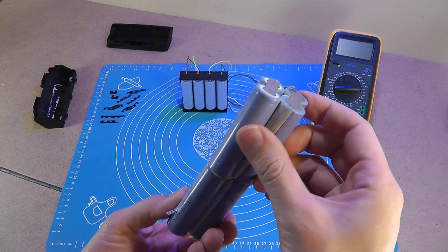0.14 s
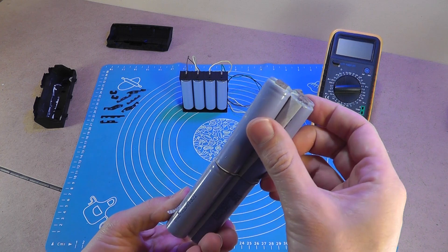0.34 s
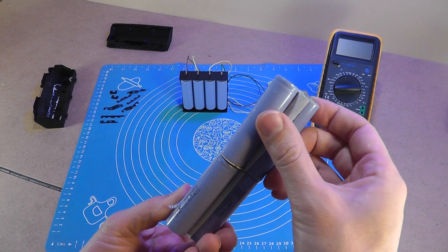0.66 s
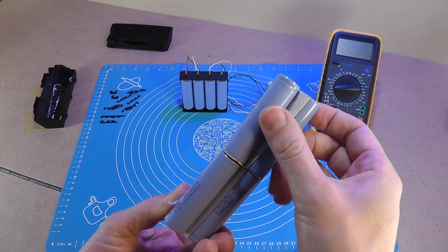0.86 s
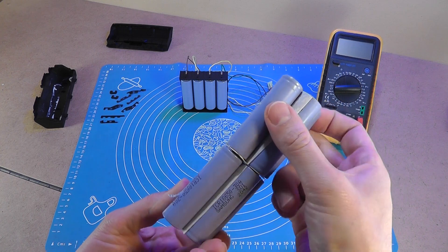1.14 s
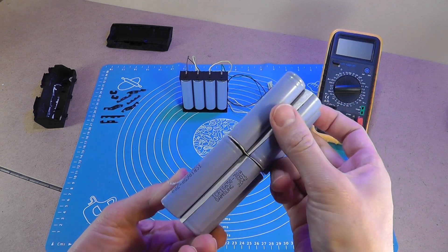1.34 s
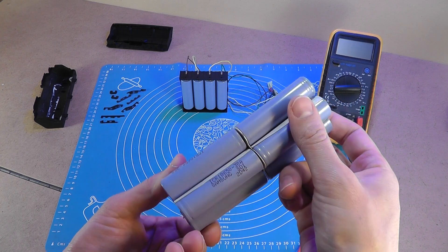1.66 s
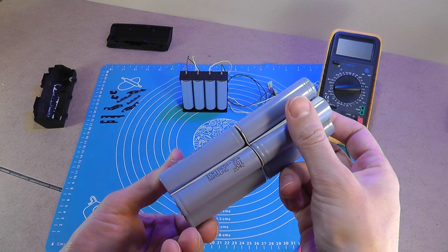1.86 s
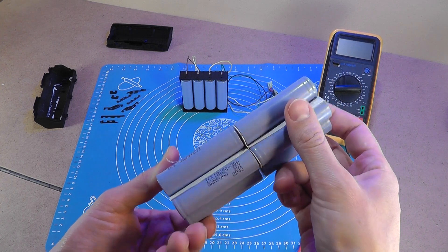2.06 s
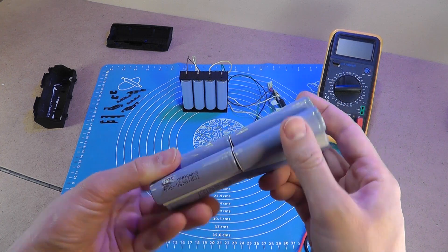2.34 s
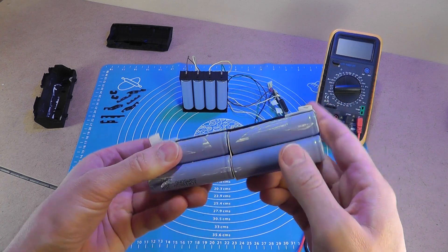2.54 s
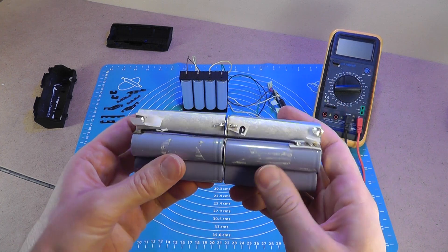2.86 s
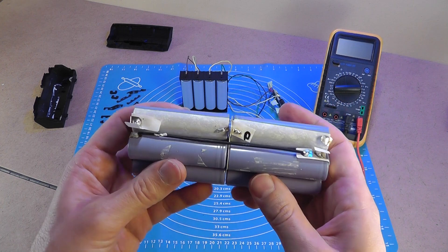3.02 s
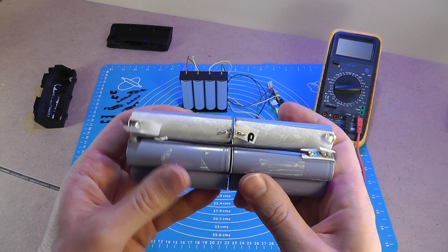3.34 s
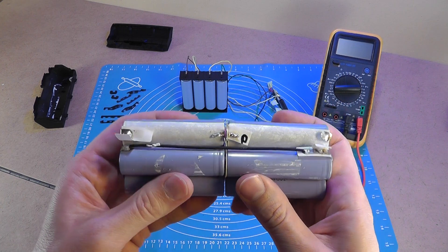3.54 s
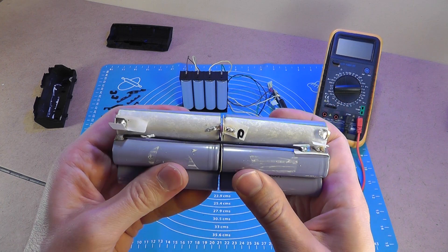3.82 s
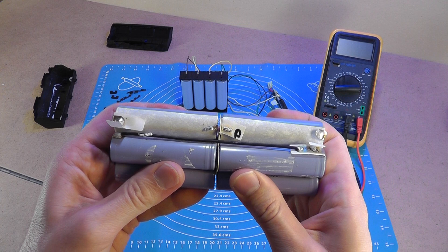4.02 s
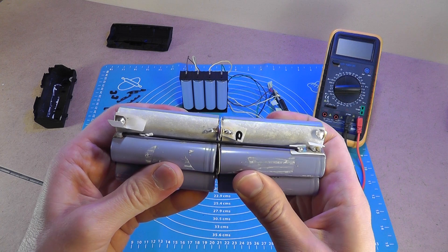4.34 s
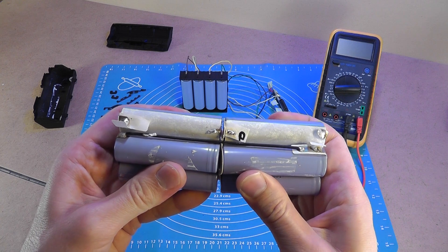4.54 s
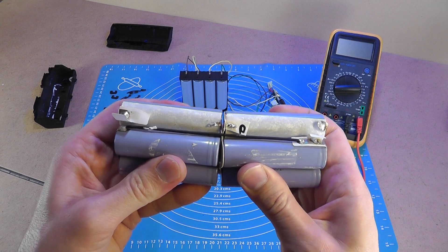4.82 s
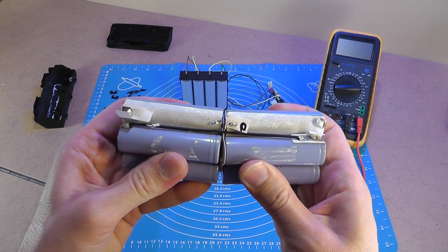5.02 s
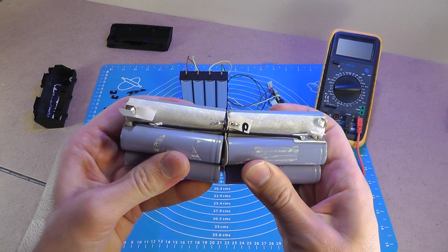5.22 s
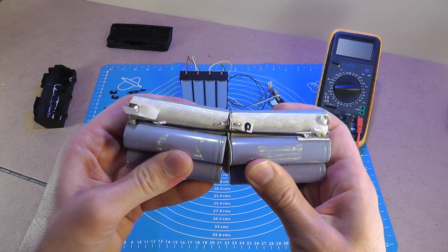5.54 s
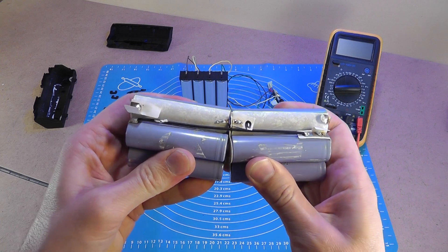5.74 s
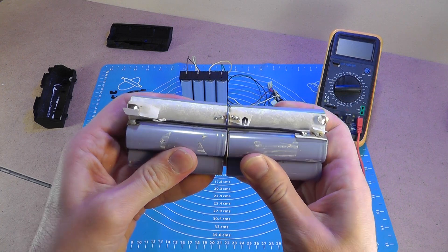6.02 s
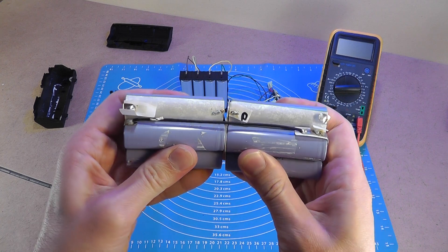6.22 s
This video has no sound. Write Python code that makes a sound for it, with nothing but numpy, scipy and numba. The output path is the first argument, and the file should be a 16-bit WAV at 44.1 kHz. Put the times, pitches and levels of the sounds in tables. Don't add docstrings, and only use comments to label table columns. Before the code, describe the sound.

A pack of steel cells is turned and bent in the hands, clicking and crackling, ending in sharp knocks in a quiet, hard room.

```python
import sys
import numpy as np
from scipy import signal
from scipy.fft import rfft, irfft
from scipy.io import wavfile
from scipy.ndimage import uniform_filter1d
from numba import njit

SR = 44100
rng = np.random.default_rng(int(sys.argv[2]) if len(sys.argv) > 2 else 0)


def to_linear_factor(level_db):
    exponent = np.asarray(level_db, float) / 20
    return 10 ** exponent


def waveform_to_disk(signal):
    frames = np.transpose(np.atleast_2d(signal))
    scaled = np.clip(frames, -1, 1) * 32767
    samples = np.round(scaled).astype(np.int16)
    wavfile.write(sys.argv[1], SR, samples)


N = 281358
TIME = np.arange(N) / SR
STRIP_PER_BRIGHT = 0.53


def level(x, db):
    return x * to_linear_factor(db) / np.sqrt(np.mean(x ** 2))


def peak(y, db):
    return y * to_linear_factor(db) / np.max(np.abs(y))


def band(x, hz, width):
    return signal.lfilter(*signal.iirpeak(min(hz, 0.45 * SR), hz / width, fs=SR), x)


def noise():
    return rng.standard_normal(N)


def walk(rate):
    hold = int(SR / rate)
    steps = np.repeat(rng.standard_normal(N // hold + 1), hold)
    return uniform_filter1d(steps, hold)[:N]


def curve(rows, column):
    rows = np.array(rows)
    return to_linear_factor(np.interp(TIME, rows[:, 0], rows[:, column], left=-200, right=-200))


def swell(s, db, rise, fall):
    before = (s - TIME) / max(rise, 0.003)
    after = (TIME - s) / max(fall, 0.003)
    away = np.where(TIME < s, before, after)
    return to_linear_factor(db - 25 * np.minimum(away, 4) ** 1.4)


def add(out, s, sound):
    i = int(s * SR)
    out[i:i + len(sound)] += sound[:N - i]


def ring(modes, chance, spread, scatter_db, damp=1):
    hz, db, t60 = np.transpose(modes)[:, :, None]
    t = TIME[:3000]
    count = len(hz)
    hz = hz * (1 + spread * chance[0, :count, None])
    gain = to_linear_factor(db + scatter_db * chance[1, :count, None])
    decay = 1000 ** (-damp * t / t60)
    return np.sum(gain * np.sin(2 * np.pi * hz * t) * decay, axis=0)


def floor():
    # harmonic number, level_db
    hum_lines = [(1, -54), (3, -63), (5, -81), (6, -95), (7, -89), (9, -95), (11, -94), (13, -101),
                 (17, -97), (19, -98)]
    # time_s, level_db
    fan_levels = [(0, -86), (2, -84), (4.4, -86.5), (4.9, -99), (6.4, -99)]
    # frequency_hz, density_db (per Hz)
    hiss_shape = [(40, 4), (100, -2), (300, -10.5), (700, -16.5), (1500, -18.5), (3500, -22), (8000, -24.5),
                  (16000, -24)]
    mains_hz, mains_start = 49.996, 1.2
    phase = 2 * np.pi * mains_hz * TIME + mains_start
    hum = sum(np.sqrt(2) * to_linear_factor(db) * np.sin(k * phase) for k, db in hum_lines)
    hum = hum * to_linear_factor(0.044 * walk(3.1))
    fan = curve(fan_levels, 1) * level(band(band(noise(), 1374, 36.3), 1368, 54), 0)
    hz, db = np.transpose(hiss_shape)
    bins_hz = np.arange(N // 2 + 1) * SR / N
    shape = to_linear_factor(np.interp(np.log(bins_hz + 1), np.log(hz), db))
    hiss = level(irfft(rfft(noise()) * shape, N), -73.5)
    return hum + fan + hiss


def bumps():
    # start_s, can_peak_db, thud_db (against the can), chatter_ms
    bump_hits = [(1.2097, -48.5, -13, 4.5), (1.3326, -29.5, -1.5, 2.3), (1.3529, -56, 9, 1.8),
                 (1.381, -53, -5, 1.5), (1.3927, -57.5, 14.5, 4.3), (1.4216, -60, -10, 2.1),
                 (2.279, -53.5, -20, 6), (2.4282, -49.5, 5.5, 2.5), (3.4764, -53, -1, 3),
                 (3.4952, -60, -7, 2.1), (3.4997, -57, -8, 2.1), (3.5416, -66.5, 25, 4.3),
                 (3.7356, -68, -15, 2.1), (3.7585, -70.5, 6, 2.3), (4.273, -65, -4, 1.1),
                 (4.2762, -59.5, -9, 2.5)]
    strip_db, wrap_db = -32, -39
    return [(s, db, db + thud, db + strip_db, db + wrap_db, ms) for s, db, thud, ms in bump_hits]


def taps():
    # start_s, peak_db, pitch_hz, t60_s
    tap_hits = [
        (1.33, -37.5, 899, 0.065),
        (1.391, -52, 1800, 0.031),
        (2.427, -50, 1813, 0.093),
        (2.495, -39.5, 2130, 0.025),
        (3.42, -53, 487, 0.17),
        (3.474, -44.5, 862, 0.099),
        (3.541, -39, 1251, 0.08),
        (6.134, -43.5, 1445, 0.061),
                (2.494, -43, 224, 0.13),
        (3.759, -59, 240, 0.076),
                (1.396, -46, 890, 0.04),
        (2.495, -54, 586, 0.13),
        (5.003, -57.5, 497, 0.044),
    ]
    out = np.zeros(N)
    push = np.hanning(24)
    rows = tap_hits
    chances = rng.standard_normal((len(rows), 2, 2))
    for (s, db, hz, t60), chance in zip(rows, chances):
        modes = [(hz, 0, t60), (4 / 3 * hz, -8, 0.5 * t60)]
        sound = np.convolve(ring(modes, chance, 0.005, 0.5), push)
        add(out, s + 0.0015, peak(sound, db - 6))
    return out


def rubs():
    # peak_s, level_db, rise_s, fall_s, low_part_db (against the stroke)
    strokes = [
        (1.34, -62, .05, 0.13, -9),
        (1.487, -57, 0.022, 0.016, -23.5),
        (3.22, -74, 0.063, 0.076, -17),
        (3.44, -61, .14, 0.15, -3.5),
        (3.555, -82, 0.028, 0.33, -1.5),
        (3.75, -67.5, .04, 0.16, -11),
        (4.289, -76, 0.087, .016, -13),
    ]
    # frequency_hz, width_hz, level_db
    rub_bands = [(3320, 1240, 12.5), (4440, 770, 1.5), (8500, 2200, -12)]
    grain = noise() * to_linear_factor(2.5 * walk(120))
    high = sum(to_linear_factor(db) * band(band(grain, hz, width), hz, 0.67 * width) for hz, width, db in rub_bands)
    high = level(high, 0)
    low = level(band(band(noise(), 1330, 1080), 1550, 930), 0)
    return sum(swell(*stroke) * (high + to_linear_factor(low_db) * low) for *stroke, low_db in strokes)


def creak():
    # peak_s, level_db, rise_s, fall_s
    bends = [(1.45, -77, 0.036, 0.41), (2.784, -78.5, 0.25, 0.13), (4.275, -83, .02, 0.33),
             (4.46, -77.5, 0.32, .4), (4.89, -87, .16, 0.028), (5.004, -72, 0.024, 0.15),
             (5.198, -63, 0.33, .25), (5.41, -66, .3, 0.1), (5.945, -57.5, 0.14, 0.012)]
    slip_chance = 0.013
    specks = noise() * (rng.random(N) < slip_chance) * to_linear_factor(4.0 * walk(60))
    film = band(band(specks, 12700, 5000), 12800, 7600) + 0.38 * band(specks, 10000, 1500)
    film = film + 1.65 * band(specks, 4600, 400) + 0.5 * band(specks, 6300, 430)
    film = level(film, 0.5)
    return sum(swell(*bend) for bend in bends) * film


def clicks():
    # start_s, can_peak_db, brightness_db, chatter_ms
    click_hits = [(1.4848, -52, 26, 3.1), (1.499, -61, 23, 1.5), (1.5263, -56.5, 20.5, 1.9),
                  (2.2971, -38.5, 9, 1.7), (2.395, -31, 5, 1.2), (2.6555, -51, 14.5, 1.1),
                  (4.3696, -54.5, 2, 6.8), (4.3942, -35, 5.5, 1.2), (4.5201, -56.5, 18, 3.4),
                  (4.5329, -21.5, -3.3, 1.35), (4.7749, -39, 4.5, 3.4), (4.8054, -42.5, 2.5, 1.4),
                  (4.839, -52.5, 7, 3), (5.0038, -31, -1.5, 1.9), (5.1354, -49.5, 7, 2.7),
                  (5.1928, -40, 6.5, 2.4), (5.2278, -32, 9.5, 2), (5.294, -46, 3, 1.3),
                  (5.3563, -35, 4.5, 0.98), (5.4437, -54.5, 11.5, 5.2), (5.4619, -52, 12, 3.4),
                  (5.88, -36, 2, 1.1), (5.9238, -52.5, -3, 3.1), (6.071, -44.5, 8.5, 2.8),
                  (6.0821, -62, 17, 5.7)]
    thud_db, strip_db = -30.5, -2
    return [(s, db, db + thud_db, db + strip_db + STRIP_PER_BRIGHT * bright, db + bright, ms)
            for s, db, bright, ms in click_hits]


def cracks():
    # start_s, can_peak_db, brightness_db, chatter_ms
    crack_hits = [
        (2.4915, -38, 1, 1.3),
        (2.4962, -36.5, 10.5, 1.3),
        (5.1173, -45.5, 10.5, 1.6),
        (4.4414, -62, 16, 2.1),
        (4.8314, -51, 1.5, 2),
        (5.3022, -69.5, 26, 2.8),
        (4.2825, -61, 4.5, 4.1),
        (1.5184, -58.5, 21, 4.8),
    ]
    thud_db, strip_db = -26, -14
    return [(s, db, db + thud_db, db + strip_db + STRIP_PER_BRIGHT * bright, db + bright, ms)
            for s, db, bright, ms in crack_hits]


def slips():
    # start_s, can_peak_db, brightness_db
    slip_hits = [(1.758, -74, 22), (2.535, -73, 17), (4.3003, -83, 25), (4.432, -64, 6), (4.4901, -62, 9),
                 (4.5032, -62, 8), (4.51, -57, -5), (4.5163, -68, 7), (4.6011, -77, 2), (4.6315, -74, 16),
                 (4.8604, -66, 16), (4.8866, -81, 19), (4.951, -59, -1), (5.0316, -53, 8), (5.053, -68, 14),
                 (5.0955, -67, 15), (5.107, -60, 7), (5.142, -58, 6), (5.168, -65, 7), (5.1755, -57, 5),
                 (5.2725, -58, -5), (5.312, -69, 24), (5.3386, -72, 18), (5.829, -54.5, 7),
                 (5.8728, -61, 10)]
    thud_db, strip_db, chatter_ms = -24, -6.5, 2.1
    return [(s, db, db + thud_db, db + strip_db + STRIP_PER_BRIGHT * bright, db + bright, chatter_ms)
            for s, db, bright in slip_hits]


def knocks():
    # start_s, can_peak_db, thud_db, strip_and_wrap_db (both against the can), chatter_ms
    knock_hits = [(5.4726, -47.5, -5.5, 2.5, 6.3), (5.4892, -37.5, 10.5, 18.5, 3.3),
                  (5.4911, -11, -11, 4, 2.7), (5.4985, -12, -37, -3, 0.93),
                  (5.955, -14.5, -18.5, -8.5, 1.73), (6.061, -32.5, -17, -2, 4),
                  (6.1344, -43, -3, 11, 0.78), (6.1679, -43.5, -7, 10, 1.9), (6.182, -25.5, -15, -2, 1.7),
                  (6.2015, -18, -4.5, 10, 0.86), (6.2358, -5.5, -19, -4.5, 1.3)]
    wrap_db = 0.63
    return [(s, db, db + thud, db + top, db + top + wrap_db, ms) for s, db, thud, top, ms in knock_hits]


def ticks():
    regrips = [
        2.0,
        4.0,
        5.48,
    ]
    # frequency_hz, level_db, t60_s
    can_modes = [
        [(2820, 4, 0.0054), (3330, 9, 0.0058), (3900, -7.5, 0.0032), (4020, -5, 0.014), (4780, -31, 0.0085)],
        [(3000, -9, 0.017), (3380, -5, 0.021), (3630, 7.5, 0.0077), (4270, -4, 0.033), (4850, -14, 0.011)],
        [(3210, -34, 0.0052), (3420, -6.5, 0.012), (3790, 4, 0.016), (4300, -5.5, 0.015), (4940, -16, 0.0087)],
        [(2640, -7, 0.0093), (3290, -10, 0.019), (3680, 8.5, 0.0043), (4710, 5, 0.0067), (5240, -11, 0.0041)],
    ]
    # frequency_hz, level_db, t60_s
    thud_modes = [
        [(950, 2.5, 0.018), (1270, -24, 0.0035), (1880, -1.5, 0.015), (2280, 9.5, 0.0082)],
        [(1000, -25, .012), (1220, -7, 0.019), (1770, 14, 0.01), (2380, 7, 0.027)],
        [(950, -19, .008), (1320, -2, 0.0071), (1750, -1, 0.0036), (2240, 9, 0.0053)],
        [(1110, -14, 0.008), (1480, -11, 0.0032), (1855, 7, 0.006), (2336, 4, 0.013)],
    ]
    # frequency_hz, level_db, t60_s
    strip_modes = [
        [(4970, 4, 0.0034), (6200, -3, 0.0053), (7000, 12, 0.0026), (7600, -1, 0.0046), (8510, -8, 0.0023)],
        [(5100, 1, 0.0032), (6360, 3, 0.0039), (6940, -2, .003), (7800, 2, 0.0023), (8740, 3.5, 0.013)],
        [(5340, -5, 0.0025), (6450, 6, 0.0041), (6970, 1.5, 0.0031), (7660, -3, 0.0069), (8660, -5.5, 0.0039)],
        [(5220, 2, 0.0059), (6220, 3, 0.0055), (6966, -2, 0.01), (7635, -0.5, 0.0065), (8300, 5, 0.0025)],
    ]
    # frequency_hz, level_db, t60_s
    snap_modes = [(9700, 5, 0.0022), (10900, 10, 0.0021), (12000, 0, 0.0059), (13700, 2.5, 0.0044),
                  (13400, 7, 0.0013), (17600, -8.5, .003)]
    # low_hz, high_hz
    radiated = [(2650, 5400), (820, 2650), (5000, 9200), (8800, 17000)]
    hard_from_db, hard_grow = -9.5, 2.77
    near, around = np.zeros((2, N))
    rows = knocks() + bumps() + clicks() + cracks() + slips()
    chances = rng.standard_normal((len(rows), 4, 2, 8))
    bounces = rng.standard_normal((len(rows), 800))
    bounces = bounces * to_linear_factor(6.85 * rng.standard_normal((len(rows), 800)))
    filters = [signal.butter(4, edge, "bandpass", fs=SR, output="sos") for edge in radiated]
    for (s, *dbs, chatter_ms), chance, bounce in zip(rows, chances, bounces):
        push = 0.13 * bounce * np.exp(-TIME[:800] * 700 / max(chatter_ms, 0.3))
        push[0] = 1
        hard_db = hard_grow * max(max(dbs) - hard_from_db, 0)
        grip = np.searchsorted(regrips, s)
        parts = can_modes[grip], thud_modes[grip], strip_modes[grip], snap_modes
        for modes, radiate, db, part_chance in zip(parts, filters, dbs, chance):
            struck = signal.fftconvolve(ring(modes, part_chance, 0.01, 2.0), push)
            direct = peak(signal.sosfilt(radiate, struck), db + hard_db)
            blur = ring(modes, part_chance, 0.01, 1.5, 1.1 + 0.06 * hard_db)
            blur = signal.sosfilt(radiate, blur)
            add(near, s, direct)
            add(around, s, blur * np.sqrt(np.sum(direct ** 2) / np.sum(blur ** 2)))
    return near, around


def room(near, around):
    # frequency_hz, t60_s, level_db
    tail_bands = [(463, 0.42, -5.5), (1180, 0.48, -8.5), (2050, 0.65, -8), (3170, 0.5, -6),
                  (5360, 0.62, -4), (7250, 0.27, -10.5), (10600, 0.32, -2.5), (14600, 0.18, -8.5)]
    tail_db, desk_s, desk_db = -17, 0.0078, -14
    t = TIME[:SR]
    tail = np.zeros(SR)
    for hz, t60, db in tail_bands:
        hiss = level(band(noise(), hz, hz / 3.9), 0)[:SR]
        tail += to_linear_factor(db) * hiss * 1000 ** (-t / t60) / np.sqrt(t60 * SR / 14)
    tail = tail * to_linear_factor(tail_db) * (1 - np.exp(-t / 0.00065))
    desk = to_linear_factor(desk_db) * np.roll(near, int(desk_s * SR))
    return near + desk + signal.fftconvolve(around, tail)[:N]


def scene():
    near, around = ticks()
    hands = taps() + rubs() + creak()
    return (room(near + hands, around + hands) + floor())[None]


@njit
def follow(x, attack, release):
    out, e = np.empty(len(x)), 0.
    for i in range(len(x)):
        e += (abs(x[i]) - e) * (attack if abs(x[i]) > e else release)
        out[i] = e
    return out


def roll_off(x):
    return signal.sosfilt(signal.butter(12, 17000, fs=SR, output="sos"), x)


def record(dry):
    attack_s, release_s, ceiling = 0.00027, 0.28, 0.51
    x = dry[0]
    seen = follow(x, 1 / (attack_s * SR), 1 / (release_s * SR))
    held = x * np.minimum(1, ceiling / (seen + 1e-9))
    overload = 0.054 * (np.abs(held) > 0.36)
    charge = follow(overload, 1 / (0.00012 * SR), 1 / (0.04 * SR))
    sag = signal.sosfilt(signal.butter(1, 0.55, "highpass", fs=SR, output="sos"), charge)
    treble = signal.ellip(8, 0.2, 50, 16000, fs=SR, output="sos")
    clipped = 0.56 * np.tanh(signal.sosfilt(treble, held) / 0.56)
    mix = signal.sosfilt(treble, clipped - sag)
    return roll_off(mix[None])


dry = scene()
out = record(dry)
waveform_to_disk(out)
```